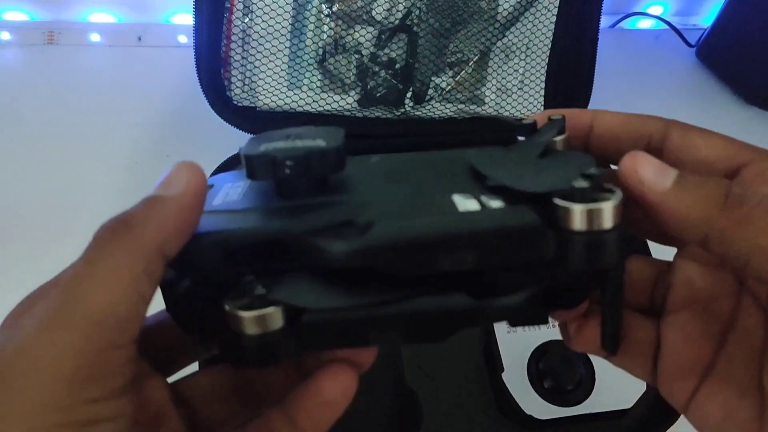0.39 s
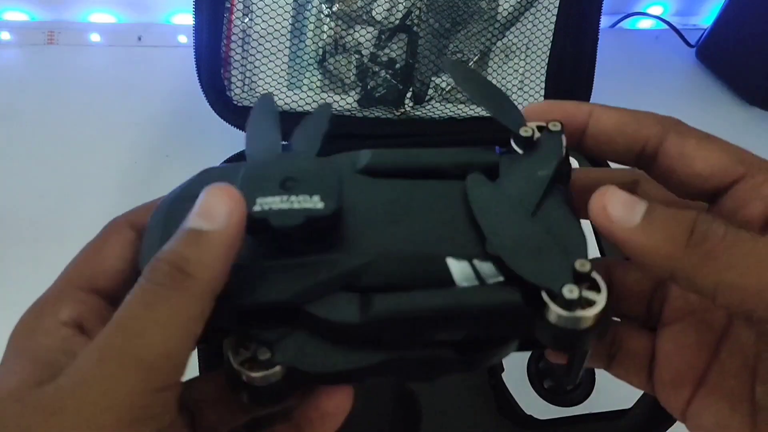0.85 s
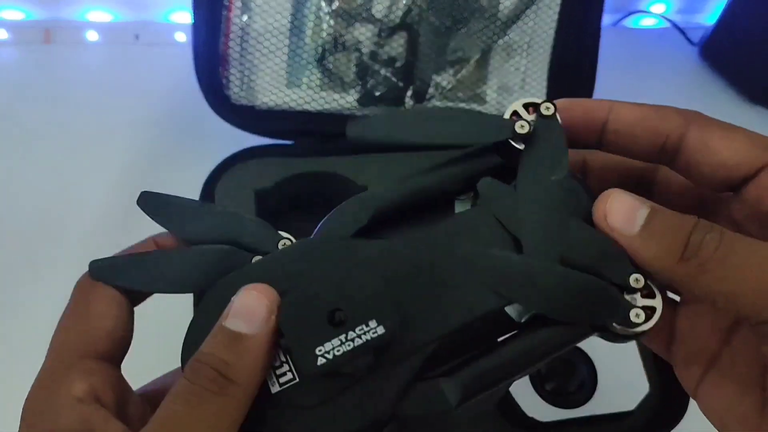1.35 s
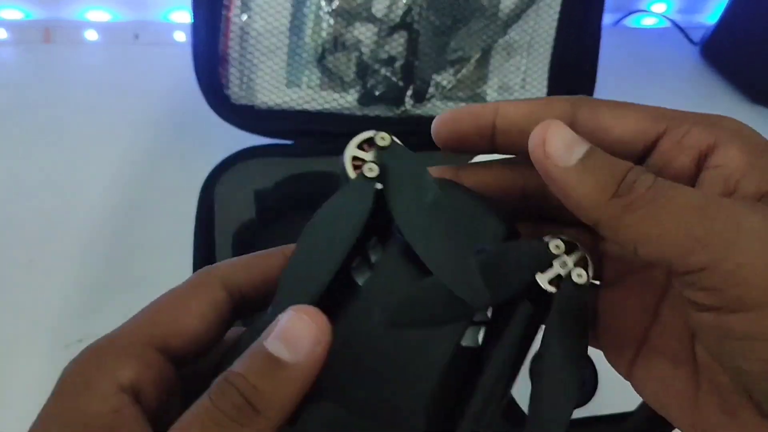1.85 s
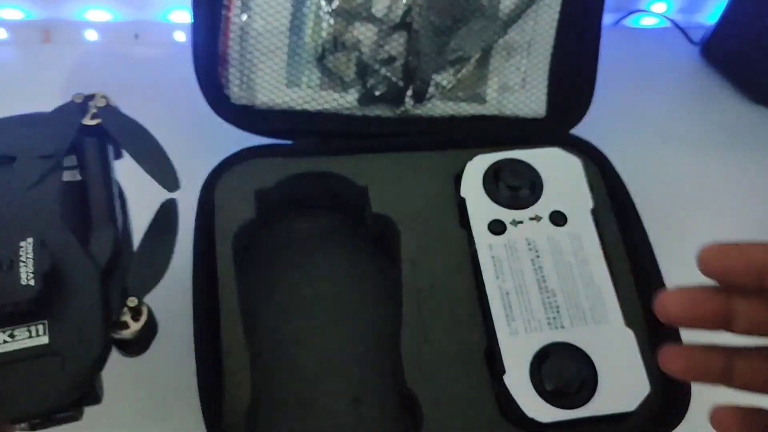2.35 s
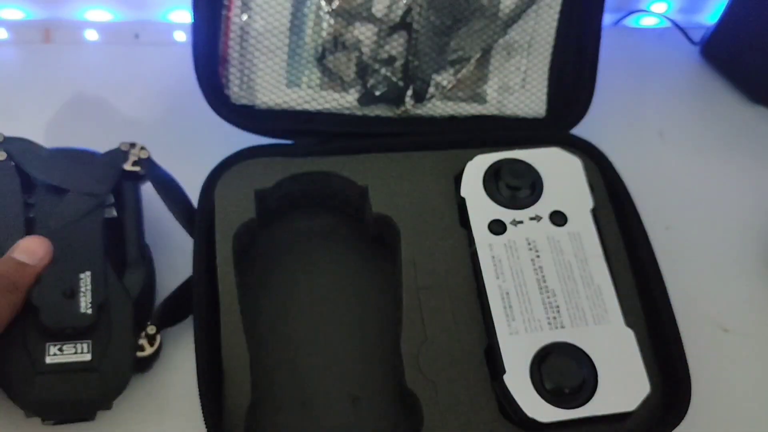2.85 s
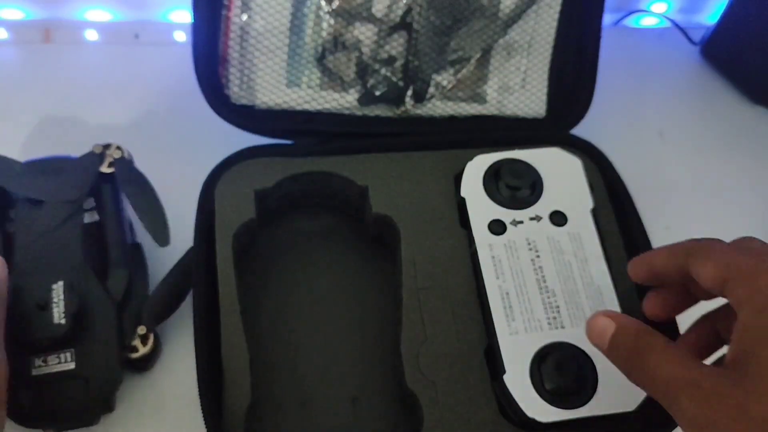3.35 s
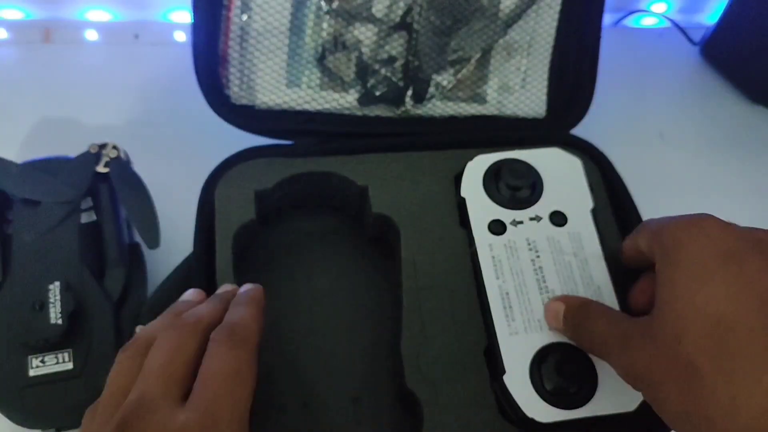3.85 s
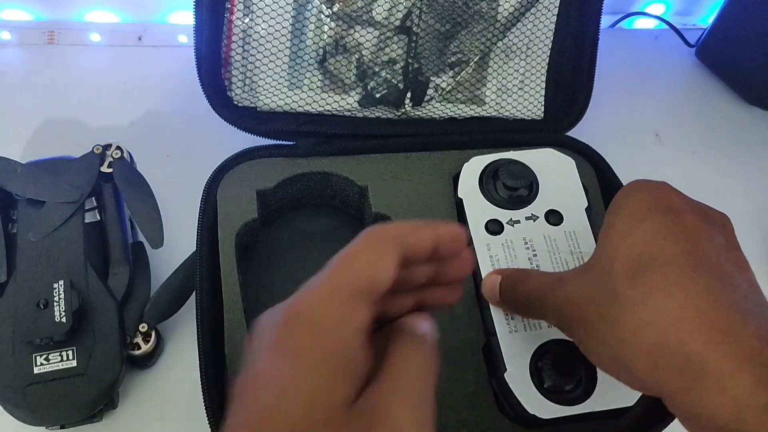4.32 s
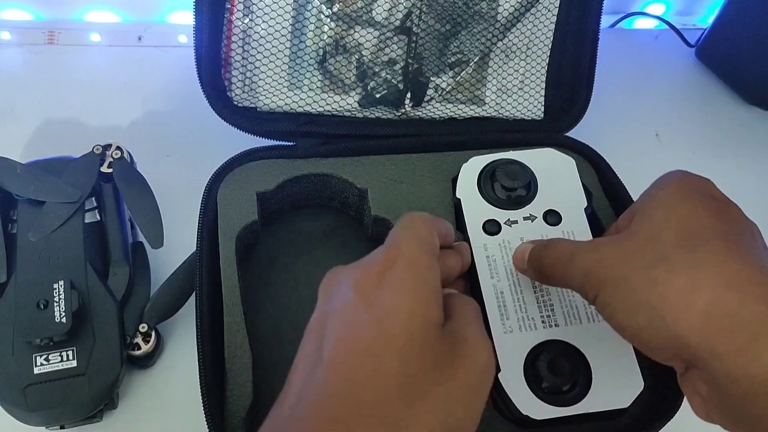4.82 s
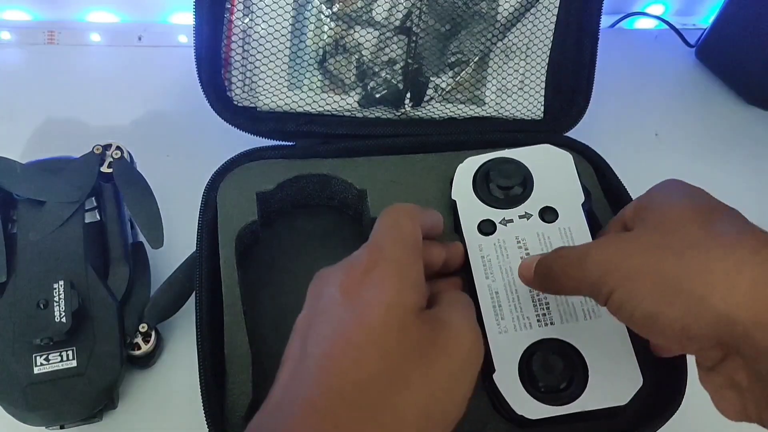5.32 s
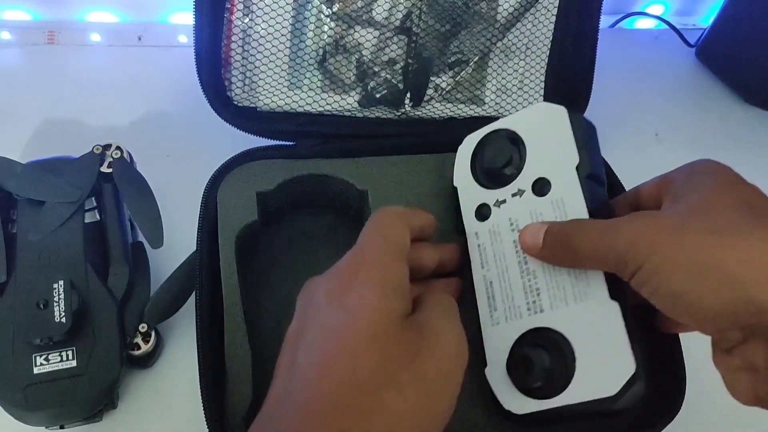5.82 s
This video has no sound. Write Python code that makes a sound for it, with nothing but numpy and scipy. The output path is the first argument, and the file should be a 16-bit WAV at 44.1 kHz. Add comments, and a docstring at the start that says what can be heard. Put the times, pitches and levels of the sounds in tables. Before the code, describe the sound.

Close plastic clicks, sharp snaps and dry rubbing, soft knocks on a desktop, then a squeaky scuff as a hollow controller leaves its foam.

```python
"""A small quiet room, a desk, a spaced pair of phone microphones close by. Hands turn a folding plastic toy
whose arms snap into their catches, set it down to rock, then prise a hollow controller from a foam-lined case.
Snaps and scrapes are noise and tones through shell and thin-wall resonances, knocks are decaying desk modes,
and rubbing is grainy shaped noise, over room air, low rumble and a wavering hum.
The loudest snap clips, and the whole sound dips briefly once."""
import sys
import numpy as np
from scipy import signal
from scipy.fft import rfft, irfft, next_fast_len
from scipy.io import wavfile
from scipy.ndimage import map_coordinates

SR = 44100
rng = np.random.default_rng(int(sys.argv[2]) if len(sys.argv) > 2 else 0)


def amplitude_ratio(level_db):
    """Convert a level in decibels to the matching linear amplitude (field) ratio."""
    exponent = np.asarray(level_db, float) / 20
    return 10 ** exponent


def output_pcm(signal):
    """Save a mono or channel-first signal as 16-bit PCM at the path in sys.argv[1].

    Samples are clipped to [-1, 1] before scaling.
    """
    pcm = np.clip(np.atleast_2d(signal).T, -1, 1) * 32767
    wavfile.write(sys.argv[1], SR, np.round(pcm).astype(np.int16))


N = 272979  # samples

# room air and microphone hiss, spectrum: f/Hz, relative density/dB per Hz
AIR_SPECTRUM = [(53, -27.5), (90, -1.5), (125, -1), (318, -17), (481, -14), (598, -21), (966, -16),
                (2460, -22), (4070, -24.5), (5640, -28), (6570, -24), (7650, -31), (8720, -32),
                (10600, -31.5), (15000, -24), (16400, -42.5)]
# low rumble, spectrum: f/Hz, relative density/dB per Hz
RUMBLE_SPECTRUM = [(12, -13), (25, 5.5), (40, -3), (60, -9), (100, -16.5), (130, -55)]
# the phone's stand hums as the desk shakes: t/s, level/dB
STAND_SHAKE = [(0.0, -52.5), (0.33, -54.5), (0.36, -69.5), (0.45, -47), (0.57, -56), (0.67, -47),
               (0.79, -53), (1.21, -47), (1.34, -33), (1.46, -48), (1.65, -43.5), (1.9, -61), (1.93, -46),
               (2.45, -48), (2.48, -63.5), (2.53, -47.5), (3.14, -60.5), (3.28, -51.5), (3.86, -51),
               (3.95, -68), (4.1, -43.5), (4.33, -55), (4.72, -50), (4.77, -56), (5.5, -50.5),
               (5.57, -60.5), (6.03, -49.5), (6.19, -54)]
# resonance of the stand, applied twice: f/Hz, width/Hz, level/dB
STAND_RESONANCE = [(56, 15, 0)]
# likeness of left and right in diffuse sound: f/Hz, likeness (1 is identical)
LEFT_RIGHT_LIKENESS = [(40, 0.4), (300, 0.75), (800, 0.24), (2000, 0.021), (5000, 0.012)]
# decay of the room: f/Hz, t60/s
ROOM_DECAY = [(200, 0.5), (1000, 0.34), (4000, 0.23), (12000, 0.28)]
# how far the left microphone hears first: t/s, lead/samples
LEFT_LEAD = [(0, 1.67), (1.5, 13), (1.75, 1.5), (2.2, 6.5), (3.9, 15), (4.1, 2.22), (6.19, 2.33)]
# strokes of fingers and foam over plastic: t/s of the peak, rise/s, skin hiss level/dB,
# shell murmur level/dB, shell f/Hz
RUB_STROKES = [(.01, .04, -51.5, -61, 1090), (.14, .05, -49.5, -49.5, 1310), (.325, .035, -40, -55.5, 1600),
               (.38, .06, -41.5, -57.5, 1120), (1.02, .05, -54, -64, 1295), (1.12, .04, -51, -57.5, 1160),
               (1.195, .04, -44.5, -50.5, 1520), (1.3, .06, -48.5, -52, 1250),
               (1.445, 0.01, -45.5, -53, 1100), (1.576, .02, -43.5, -49.5, 1365),
               (1.65, .045, -43.5, -44.5, 1440), (1.79, .04, -40, -46.5, 1450),
               (1.89, 0.034, -44.5, -46, 1060), (2.11, .035, -57, -56, 1260), (2.281, .04, -58, -64, 820),
               (2.5, .035, -45, -52.5, 971), (2.588, .04, -50.5, -68, 1250),
               (2.845, .025, -51, -50.5, 1100), (2.986, 0.061, -47.5, -54, 1300),
               (3.3, .08, -54, -63, 1000), (3.48, .035, -53, -49.5, 985), (3.89, .05, -55.5, -56, 850),
               (4.07, .07, -56, -50.5, 900), (4.22, .06, -64.5, -59, 850), (4.502, .025, -53, -47.5, 880),
               (4.629, .045, -48, -49, 750), (4.75, .03, -43.5, -45.5, 942), (4.84, .06, -46, -50, 820),
               (5.02, .04, -52, -49.5, 750), (5.181, .06, -51.5, -53.5, 779), (5.298, .03, -48, -50.5, 800),
               (5.39, .03, -46, -47.5, 745), (5.499, .025, -44, -45.5, 755), (5.535, .012, -46, -34, 1150),
               (5.562, 0.017, -27.5, -28, 1000), (5.61, 0.022, -34.5, -35.5, 1144),
               (5.73, .06, -45, -39, 780), (5.88, .04, -47, -39.5, 750), (6.04, .06, -51, -53.5, 886)]
# skin on plastic, spectrum of the hiss: f/Hz, relative density/dB per Hz
SKIN_SPECTRUM = [(880, -19), (1500, -6.5), (1790, -4.5), (5330, -10), (9950, -22), (10800, -22),
                 (14600, -21.5), (15500, -21), (16000, -74)]
# strokes that drag on the desk: t/s of the peak, rise/s, level/dB
DRAG_STROKES = [(.2, 0.081, -54.5), (.6, 0.11, -57.5), (1.12, 0.091, -61.5), (1.85, 0.13, -54),
                (2.25, 0.072, -54), (2.49, 0.036, -54), (2.83, 0.044, -48), (3.07, 0.034, -43.5),
                (3.48, 0.057, -41), (4.1, .07, -46.5), (4.22, 0.1, -46.5), (4.54, .08, -49),
                (4.75, .025, -33.5), (4.83, 0.033, -50.5), (5.04, .07, -48), (5.24, 0.057, -47),
                (5.39, 0.021, -48), (5.491, 0.018, -42), (5.575, 0.032, -39.5), (5.8, .1, -55.5)]
# resonances of the drag, before the response is raised to 1.5: f/Hz, width/Hz, level/dB
DRAG_RESONANCES = [(119, 10, 0), (206, 35, 3.5), (345, 83, 0.5), (560, 230, -0.5)]
# clicks of plastic: t/s, ring peak level/dB, shell ring f/Hz, rattle and crack level/dB set against the ring
CLICK_EVENTS = [(.020, -54, 925, 6, 12), (.080, -40, 1138, -12, -21.5), (.3351, -12.5, 1210, -27.5, 6),
                (.3488, -4.5, 1110, -43, -3.5), (.955, -46.5, 1190, -7, 7.5), (1.100, -44, 1110, -10, -1.5),
                (1.383, -30, 1290, -11, -17.5), (1.562, -37, 1410, -10, 5.5), (1.699, -32, 1480, -4.5, 0.5),
                (1.7289, -11, 1420, -24.5, 3), (1.7326, 2, 1458, -39.5, -5),
                (1.776, -28, 1430, -17.5, -11.5), (1.895, -33, 1092, -6.5, -10.5),
                (2.275, -55, 753, -11, 11.5), (2.750, -36, 697, -5.5, -21), (2.953, -40, 1370, -8, 2),
                (2.970, -30, 1297, -7.5, -2), (3.2735, -21, 1167, -4, -48), (3.345, -39.5, 885, 2, -5),
                (3.412, -42.5, 1100, 8, -1), (3.833, -55, 1076, 12, -14), (4.344, -44.5, 720, -2.5, -15),
                (4.480, -34.5, 1200, -5, -22), (4.55, -34, 920, 2, 1), (4.555, -22, 757, -2.5, 3),
                (4.618, -39, 730, 3, 10), (4.715, -37, 910, -1.5, 12), (4.7214, -16.5, 750, 0.5, 9),
                (4.967, -42.5, 1085, -3, 8.5), (4.990, -37, 718, 1.5, -17.5), (5.091, -30.5, 1090, -1, -4),
                (5.206, -38.5, 680, -3, -22.5), (5.253, -44, 1100, 6.5, 7), (5.455, -42.5, 686, -2.5, -8.5),
                (5.468, -42, 1190, -5, 3.5), (5.614, -31.5, 1200, -5, -2.5), (5.676, -33.5, 716, -4, -9.5),
                (5.694, -32, 684, 1, 11.5), (5.855, -35.5, 670, 1, 2), (6.098, -48.5, 1310, 3.5, -14)]
# a hard blow comes with a firm grip and rings fewer cycles: ring peak level/dB, cycles to die by 60 dB
CYCLES_BY_LEVEL = [(-34.5, 31.5), (-28, 16.5)]
# loose parts rattling in the shell: f/Hz, width/Hz, level/dB
RATTLE_RESONANCES = [(650, 444, -1), (1200, 456, 5), (1880, 2080, -5.5)]
# thin plastic walls: f/Hz, width/Hz, level/dB
WALL_RESONANCES = [(2280, 1000, 2), (3560, 500, 7.5), (4170, 580, 3), (6230, 1300, -1), (8340, 1000, -2),
                   (12000, 1600, -7.5), (15000, 1800, -9.5)]
# hinges and edges that catch at once and scrape: t/s of the start, length/s, level/dB, shell f/Hz, thin wall f/Hz
SCRAPE_EVENTS = [(.078, .14, -48, 1290, 3430), (0.254, 0.0073, -29.5, 1640, 3530),
                 (1.382, 0.025, -30, 1370, 2400), (1.425, 0.022, -39, 1030, 2200),
                 (1.553, 0.07, -39.5, 6160, 7800), (1.612, 0.071, -38, 1380, 3740),
                 (1.885, 0.027, -42, 3860, 5000), (2.085, .04, -50, 3900, 3200),
                 (2.815, 0.042, -51, 3770, 2300), (2.964, 0.069, -46, 1360, 2270)]
# knocks on the desk top: t/s, level/dB
KNOCK_EVENTS = [(2.7493, -20.5), (2.769, -23), (2.784, -31), (2.85, -32), (2.964, -31.5), (3.273, -12.5),
                (3.3446, -15), (3.411, -17), (3.4914, -24.5), (3.52, -25.5), (4.557, -17), (4.7214, -20),
                (5.092, -30), (5.876, -32.5)]
# modes of the desk top: f/Hz, level/dB, t60/s
DESK_MODES = [(170.4, -12, 0.3), (204.7, -6, 0.21), (288, -1, 0.052), (385.5, 3.5, 0.045), (471, -16, 0.16),
              (541, -11, 0.065), (762, -16.5, 0.066), (1003, -11, 0.018)]
# the brief dip of the whole sound: t/s, half width/s, depth/dB
LEVEL_DIP = (3.980, .008, -30)

AIR_DB, RUMBLE_DB = -52, -50
RUMBLE_FOLLOWS = .3  # share of the stand's level swing, in dB, that the rumble takes
JOLT_DB, JOLT_S = -28.5, 0.045  # a knock's jolt against the knock's level; its rise
FALL_OVER_RISE, ROUNDNESS = 1.13, 1.6  # a stroke dies more slowly than it comes; 1 pointed, 2 bell-shaped
# hands never quite still
HOLD_HISS_DB, HOLD_MURMUR_DB, HOLD_HZ, HOLD_DRAG_DB = -64.5, -74.5, 1020, -60
# treble of the hiss; quicker strokes are brighter
LIFT_DB, LIFT_DB_PER_HALVING, USUAL_RISE_S = 3.5, 1.5, 0.023
FIRST_CONTACT = 1.1  # sharp start of the rattle, over its body
PAN_DB_PER_SAMPLE, PAN_SCATTER_DB = 0.76, 1.5  # louder at the nearer microphone; the face turned to it varies
SCRAPE_SAG_DB, SCRAPE_RELEASE_S = -6, .009  # fade along the scrape; softness of its end
WALL_DB, SHARPNESS = -7, 5.3  # wall against shell; shell Hz over width; both before the response is squared


def unit(x):
    """Scaled to rms 1."""
    return x / np.sqrt(np.mean(x ** 2) + 1e-20)


def along(points, hz):
    """Reads (Hz, value) points on a log frequency axis."""
    f, v = np.transpose(points)
    return np.interp(np.log(hz + 1), np.log(f + 1), v)


def curves(rows, at=None):
    """Each later column read against the first, at every sample's time unless told where."""
    first, *columns = np.transpose(rows)
    where = np.arange(N) / SR if at is None else at
    return [np.interp(where, first, column) for column in columns]


def wobble(rate):
    """A smooth random curve, rate knots a second."""
    knots = rng.standard_normal(int(N * rate / SR) + 4)
    return map_coordinates(knots, [np.arange(N) * rate / SR])


def filtered(x, response):
    """x times a complex response of frequency."""
    size = next_fast_len(x.shape[-1] + 8192)
    spectrum = rfft(x, size) * response(np.fft.rfftfreq(size, 1 / SR))
    return irfft(spectrum, size)[..., :x.shape[-1]]


def resonances(peaks):
    """Causal response of (Hz, width Hz, dB) resonances, neighbours in opposite sign."""
    def response(f):
        return sum((-1) ** k * amplitude_ratio(db) * 1j * f * width / (hz * hz - f * f + 1j * f * width)
                   for k, (hz, width, db) in enumerate(peaks))
    return response


def likeness_angle(hz):
    """Mixing angle that gives two independent noises the likeness of the spaced microphones."""
    return np.arccos(np.clip(along(LEFT_RIGHT_LIKENESS, hz), 0, 1)) / 2


def pair(gain, grain_db):
    """Stereo noise of rms 1, coloured by gain(Hz), its level roughened by stick and slip."""
    noise = rng.standard_normal((2, N)) * amplitude_ratio(grain_db * wobble(250))

    def colour(hz):
        angle = likeness_angle(hz)
        return gain(hz) * [np.cos(angle), np.sin(angle)]

    mid, side = filtered(noise, colour)
    return unit(np.array([mid + side, mid - side]))


def in_room(x, s, wet_db):
    """One short sound at both microphones plus the walls' answer, which builds up, then dies by frequency."""
    hz, t, z = signal.stft(rng.standard_normal((2, SR // 2)), SR, nperseg=256)
    angle = likeness_angle(hz)[:, None]
    mid, side = z[0] * np.cos(angle), z[1] * np.sin(angle)
    fade = (1 - np.exp(-t / 0.0024)) * amplitude_ratio(-60 * t / along(ROOM_DECAY, hz)[:, None])
    tail = signal.istft(np.array([mid + side, mid - side]) * fade, SR, nperseg=256)[1]
    tail = tail / np.linalg.norm(tail[0])
    out = amplitude_ratio(wet_db) * signal.fftconvolve(x.mean(axis=0)[None], tail, axes=1)[:, :SR // 2]
    lead = round(float(curves(LEFT_LEAD, s)[0]))
    out[0, :x.shape[1]] += x[0]
    out[1, lead:lead + x.shape[1]] += x[1]
    return out


def add(track, s, x):
    """Mixes x into the track at s seconds."""
    track[:, round(s * SR):][:, :x.shape[1]] += x


def strokes(s, rise, t):
    """Power envelope of each stroke, one row each, peak 1; rise is from 1/e of the peak power."""
    late = t - np.asarray(s)[:, None]
    span = np.asarray(rise)[:, None] * np.where(late > 0, FALL_OVER_RISE, 1)
    return np.exp(-np.abs(late / span) ** ROUNDNESS)


def summed(shape, db, still_db, t):
    """Gain per sample of strokes of the given levels, added in power to a steady level."""
    power = amplitude_ratio(db) ** 2 @ shape + amplitude_ratio(still_db) ** 2
    return np.interp(np.arange(N) / SR, t, np.sqrt(power))


def background():
    """Room air and microphone hiss as steady noise, over a low rumble jolted by knocks and a wavering hum."""
    hum_db, = curves(STAND_SHAKE)
    s, db = np.transpose(KNOCK_EVENTS)
    t = np.arange(0, N / SR, .005)
    jolts = summed(strokes(s, JOLT_S + 0 * s, t), db + JOLT_DB, RUMBLE_DB, t)
    air = amplitude_ratio(AIR_DB) * pair(lambda hz: amplitude_ratio(along(AIR_SPECTRUM, hz)), grain_db=1.0)
    sway_db = RUMBLE_FOLLOWS * (hum_db - hum_db.mean()) + 1.2 * wobble(12)
    rumble = jolts * amplitude_ratio(sway_db) * pair(lambda hz: amplitude_ratio(along(RUMBLE_SPECTRUM, hz)), grain_db=5.0)
    # a narrow resonance shaken by noise, its swells flattened by the stand's damping
    hum = filtered(rng.standard_normal(N), lambda f: resonances(STAND_RESONANCE)(f) ** 2)
    hum = signal.hilbert(hum)
    hum = unit((hum / np.sqrt(np.abs(hum))).real)
    hum = amplitude_ratio(hum_db - 0.5) * (jolts / amplitude_ratio(RUMBLE_DB)) ** 0.48 * hum
    # dB, left then right
    return air + (rumble + hum) * amplitude_ratio([[.6], [-.6]])


def skin_hiss(shape, rise, hiss_db, t):
    """Skin and foam slip over plastic in a grainy hiss; a light, fast touch brightens it."""
    hiss = pair(lambda hz: amplitude_ratio(along(SKIN_SPECTRUM, hz)), grain_db=2.4)
    treble = filtered(hiss, lambda hz: 1 / (1 + (5000 / (hz + 1)) ** 4))
    lift_db = LIFT_DB + LIFT_DB_PER_HALVING * np.log2(USUAL_RISE_S / rise)
    dull = summed(shape, hiss_db, HOLD_HISS_DB, t)
    bright = summed(shape, hiss_db + lift_db, HOLD_HISS_DB, t)
    flutter = amplitude_ratio(1.2 * wobble(25) + 1.5 * wobble(90))
    return flutter * (dull * (hiss - treble) + bright * treble)


def shell_murmur(shape, shell_db, shell_hz, hz, t, z):
    """The rubbed shell colours noise by its moving resonance, the loose parts and the lower thin walls."""
    # the strongest stroke of the moment weighs most in the shell's pitch
    power, still = amplitude_ratio(shell_db)[:, None] ** 2 * shape, amplitude_ratio(HOLD_MURMUR_DB) ** 2
    centre = (shell_hz @ power + HOLD_HZ * still) / (power.sum(axis=0) + still)
    hz = hz[:, None]
    width = 450  # Hz, before squaring
    shell = np.abs(1j * hz * width / (centre ** 2 - hz ** 2 + 1j * hz * width)) ** 2
    walls = .25 * np.abs(resonances(RATTLE_RESONANCES)(hz))
    walls = walls + .08 * np.abs(resonances(WALL_RESONANCES[:2])(hz))
    murmur = signal.istft(z * (shell + walls), SR, nperseg=512)[1][:, :N]
    return summed(shape, shell_db, HOLD_MURMUR_DB, t) * amplitude_ratio(1.5 * wobble(30)) * unit(murmur)


def desk_drag(t):
    """Strokes drag on the desk: grainy noise through low, broad resonances."""
    s, rise, drag_db = np.transpose(DRAG_STROKES)
    drag = pair(lambda f: np.abs(resonances(DRAG_RESONANCES)(f)) ** 1.5 / (1 + (f / 700) ** 4), grain_db=3)
    return summed(strokes(s, rise, t), drag_db, HOLD_DRAG_DB, t) * amplitude_ratio(0.5 * wobble(16)) * drag


def sliding():
    """Rubbing strokes drive a skin hiss and a shell murmur together; other strokes drag on the desk."""
    s, rise, hiss_db, shell_db, shell_hz = np.transpose(RUB_STROKES)
    hz, t, z = signal.stft(pair(np.ones_like, grain_db=3), SR, nperseg=512)
    shape = strokes(s, rise, t)
    hiss = skin_hiss(shape, rise, hiss_db, t)
    return hiss + shell_murmur(shape, shell_db, shell_hz, hz, t, z) + desk_drag(t)


def clicks():
    """Each catch or tick rings the hollow shell (pitch set by the grip), rattles it and cracks its thin walls."""
    out, t = np.zeros((2, N + SR)), np.arange(SR // 16) / SR
    for s, db, hz, rattle_db, crack_db in CLICK_EVENTS:
        t60 = curves(CYCLES_BY_LEVEL, db)[0] / hz
        pan_db = PAN_DB_PER_SAMPLE * curves(LEFT_LEAD, s)[0] + PAN_SCATTER_DB * rng.normal()
        # the fingers close on the shell, so the ring dies ever faster
        swell = (1 - np.exp(-t / .0012)) * amplitude_ratio(-60 * (t / t60) ** 1.7)
        # a weaker second mode, 1.3 times higher, colours the ring
        neighbour = 0.095 * np.sin(2 * np.pi * 1.3 * hz * t + rng.uniform(0, 2 * np.pi))
        ring = swell / swell.max() * (np.sin(2 * np.pi * hz * t) + neighbour)
        blow = rng.standard_normal(len(t)) * (amplitude_ratio(-60 * t / 0.038) + FIRST_CONTACT * amplitude_ratio(-60 * t / 0.0028))
        rattle = filtered(blow, resonances(RATTLE_RESONANCES)) * 3.5
        # the two microphones see different faces of the part
        crack = unit(filtered(rng.standard_normal((2, len(t))), resonances(WALL_RESONANCES)))
        crack = amplitude_ratio(-60 * t / .017) * crack
        side = amplitude_ratio(db) * amplitude_ratio([[pan_db / 2], [-pan_db / 2]])
        # the ring is strongest close to the shell and feeds the room less than the crack does
        add(out, s, in_room(side * ring, s, wet_db=-11.5))
        add(out, s, in_room(side * (amplitude_ratio(rattle_db) * rattle + amplitude_ratio(crack_db) * crack), s, wet_db=-3))
    return out[:, :N]


def scrapes():
    """Uneven slips excite the shell and one thin wall, start suddenly, sag and stop."""
    out, t = np.zeros((2, N + SR)), np.arange(SR // 4) / SR
    for s, length, db, shell_hz, wall_hz in SCRAPE_EVENTS:
        slips = rng.standard_normal((2, len(t))) * amplitude_ratio(5.4 * wobble(150)[:len(t)])
        # mostly common to both microphones
        slips = .8 * slips.mean(axis=0) + .4 * slips
        body = resonances([(shell_hz, shell_hz / SHARPNESS, 0), (wall_hz, wall_hz / SHARPNESS / 2.8, WALL_DB)])
        sound = unit(filtered(slips, lambda f: body(f) * np.abs(body(f))))
        shape = amplitude_ratio(SCRAPE_SAG_DB * t / length) * (1 - np.exp(-t / .002))
        shape = shape / (1 + np.exp((t - length) / SCRAPE_RELEASE_S))
        add(out, s, in_room(amplitude_ratio(db) * shape * sound, s, wet_db=-3))
    return out[:, :N]


def knocks():
    """A soft foot lands, pushes the desk top away and rings its low modes."""
    out, t = np.zeros((2, N + SR)), np.arange(SR // 4) / SR
    for s, db in KNOCK_EVENTS:
        ring = sum(amplitude_ratio(level + rng.normal(0, 2) - 60 * t / t60) * np.sin(2 * np.pi * hz * t)
                   for hz, level, t60 in DESK_MODES)
        # the desk top radiates little below its first mode
        ring = filtered(ring, lambda f: (1j * f / (130 + 1j * f)) ** 2)
        knock = -amplitude_ratio(db) * ring / np.abs(ring).max()
        # dB, left then right
        add(out, s, in_room(knock * amplitude_ratio([[.7], [-.7]]), s, wet_db=-6))
    return out[:, :N]


def scene():
    """Everything on the desk, and the room around it."""
    return background() + sliding() + clicks() + scrapes() + knocks()


def band_limit(x):
    """A steep low-pass at the top of the band."""
    return signal.sosfilt(signal.butter(12, 16540, fs=SR, output="sos"), x)


def record(dry):
    """The level dips briefly once, then a limiter softly clips the loudest snap."""
    s, width, db = LEVEL_DIP
    dip = amplitude_ratio(db * np.exp(-((np.arange(N) / SR - s) / width) ** 2))
    mix = dry * dip
    mix = mix / (1 + np.abs(mix / 1.02) ** 8) ** (1 / 8)
    return band_limit(mix)


dry = scene()
out = record(dry)
output_pcm(out)
```